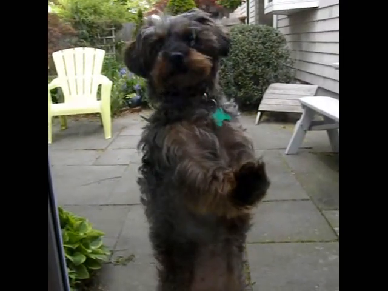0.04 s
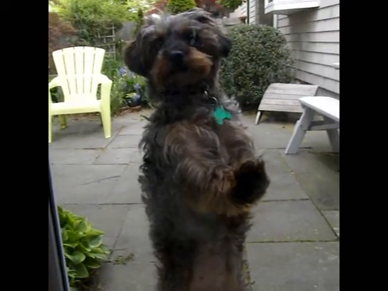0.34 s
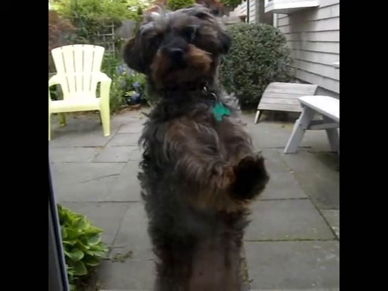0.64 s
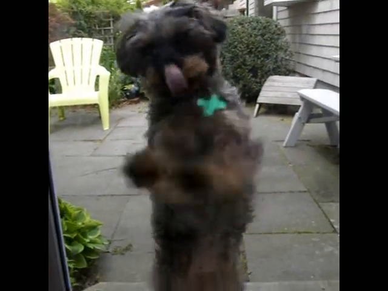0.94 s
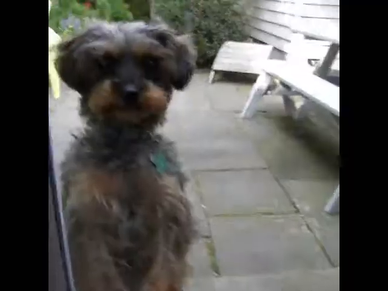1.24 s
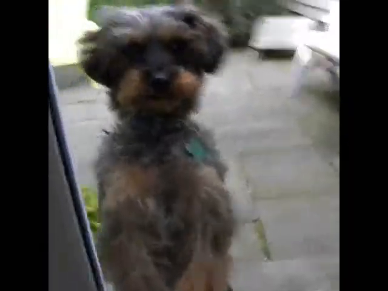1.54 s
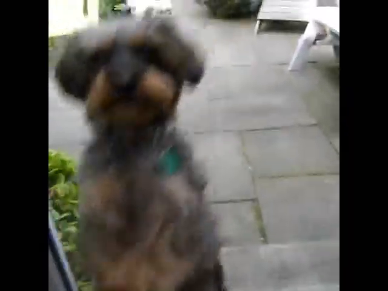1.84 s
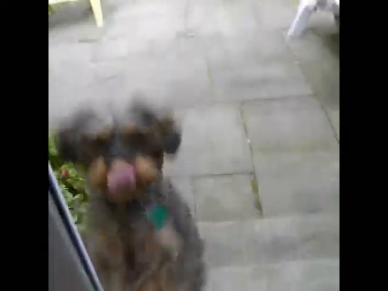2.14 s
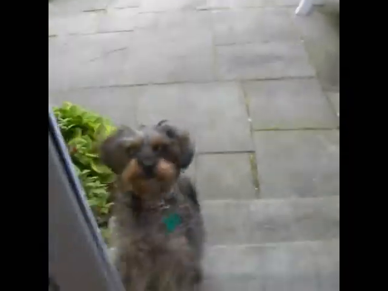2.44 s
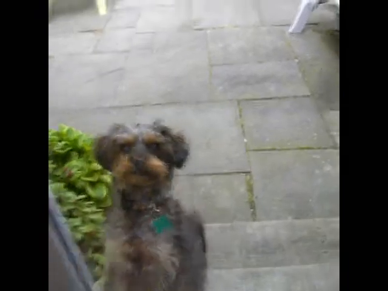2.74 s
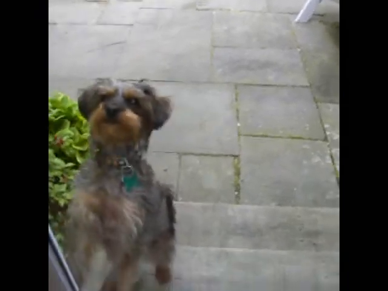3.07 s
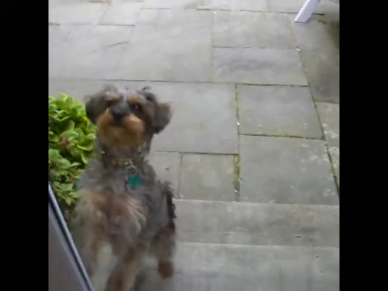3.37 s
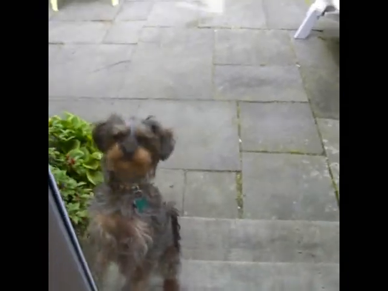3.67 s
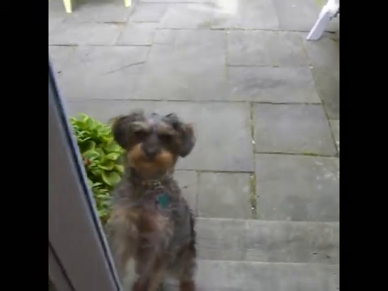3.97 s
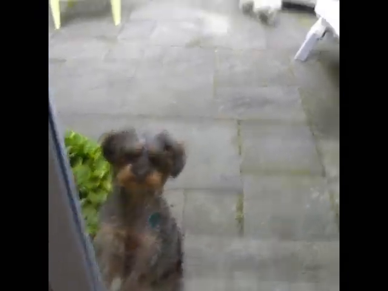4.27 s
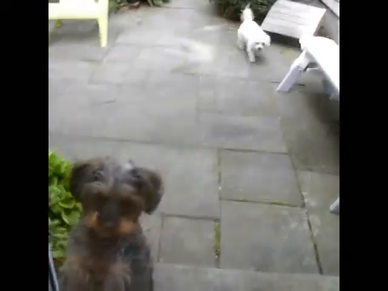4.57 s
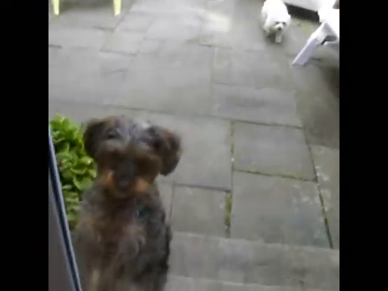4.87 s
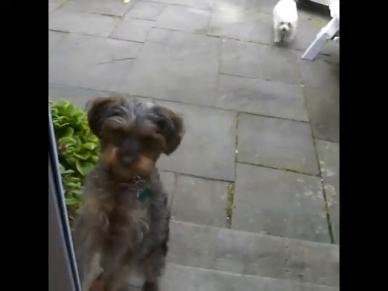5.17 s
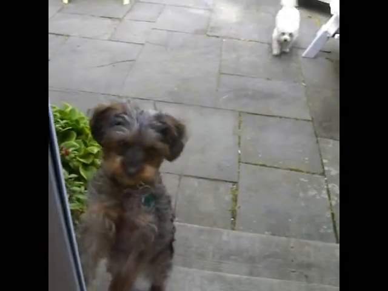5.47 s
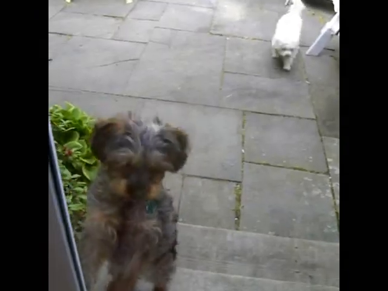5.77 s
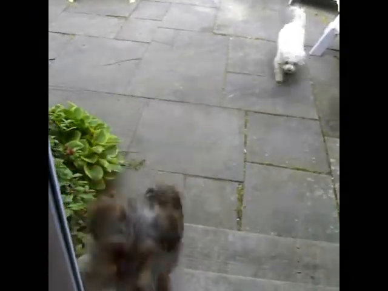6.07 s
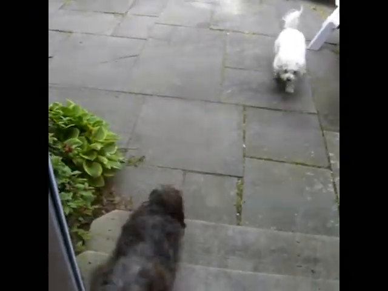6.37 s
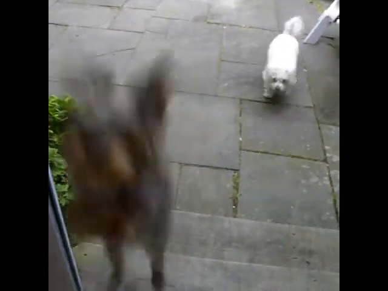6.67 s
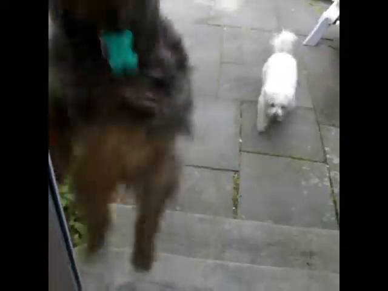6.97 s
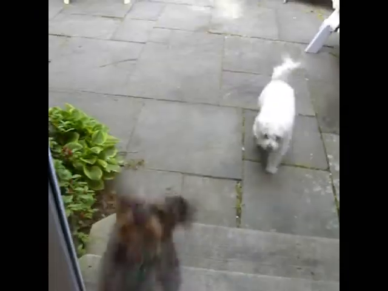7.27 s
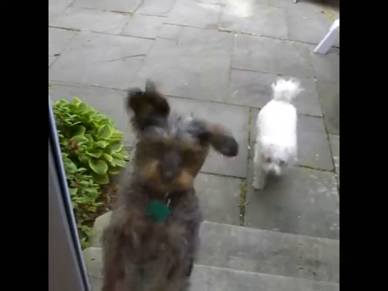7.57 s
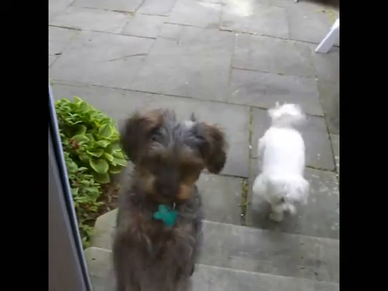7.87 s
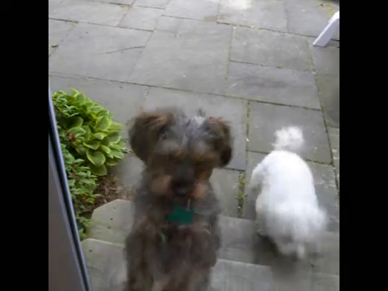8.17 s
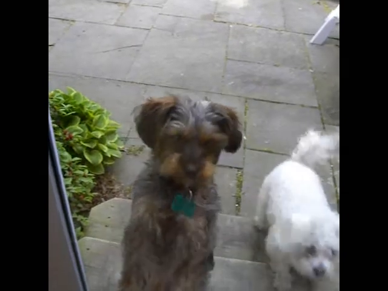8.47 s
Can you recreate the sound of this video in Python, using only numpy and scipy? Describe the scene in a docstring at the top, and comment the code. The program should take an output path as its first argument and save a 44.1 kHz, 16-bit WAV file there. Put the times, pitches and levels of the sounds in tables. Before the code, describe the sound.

Claws click, skid and scratch against a glass door as a small dog jumps at it, over a faint outdoor hush.

```python
"""Small dog at a glass patio door

Heard from the room, on a camera's microphone: a small dog jumps at the door. Its claws tap, skid and
scrape on the glass, and its paws bump the pane. Right at the microphone a hand rubs on the camera in
short strokes and a thin whine, likely the lens motor, comes and goes. A soft, distant outdoor hush
and a faint room hum lie under everything."""
import sys
import numpy as np
from scipy import signal
from scipy.fft import rfft, irfft, next_fast_len
from scipy.io import wavfile
from scipy.ndimage import uniform_filter1d, map_coordinates

SR = 44100
rng = np.random.default_rng(int(sys.argv[2]) if len(sys.argv) > 2 else 0)


def master_out(mix):
    """Clip the mix to full scale and print it as 16-bit PCM to the path in sys.argv[1]."""
    frames = np.transpose(np.atleast_2d(mix))
    ceiling = np.clip(frames, -1, 1)
    pcm = np.round(ceiling * 32767).astype(np.int16)
    wavfile.write(sys.argv[1], SR, pcm)


N = 379701
HIT_SIZE = 8192  # samples in one contact


# Spectrum of a claw on the glass: (frequency [Hz], level [dB])
CLAW_SPECTRUM = [(60, -5), (500, -14), (1050, 0), (1600, 0.5), (2300, -1), (5600, -4), (6600, -15.5),
                 (8000, -24.5), (9500, -10.5), (14500, -17)]
def tap(db, pitch_hz, body_db, blow=0.95, skid=0.15, chatter=0.18, chatter_t60=0.0077, ring_share=0.27):
    """A claw lands in one sharp blow, skids for some milliseconds and rings briefly."""
    t, octaves = np.arange(HIT_SIZE) / SR, np.log2(pitch_hz / 2140)
    # a higher tap is struck with the tip: more 4 kHz edge, less ring; a hollow one has less of both
    edge_db = -4.5 + 15 * octaves - 0.25 * body_db
    reflection = 0.7 - 0.77 * octaves - 0.15 * body_db
    skid_t60 = 0.022 * .5 ** (db / 19)  # a harder tap sticks sooner
    friction = skid * amp(-60 * t / skid_t60) + chatter * amp(-60 * t / chatter_t60)
    force = slips(HIT_SIZE, spiky_db=3) * friction
    force[0] += blow

    def contact(hz):
        # the harder the blow, the more of it gathers around the ring pitch and its third partial
        focus_db = 4 * amp(db / 2) * (hump(hz, pitch_hz, 0.16) + hump(hz, 3 * pitch_hz, 0.067))
        tint_db = body_db * hump(hz, 1070, 0.31) + edge_db * hump(hz, 4350, 0.26) + focus_db
        ring = 1 - ring_share + ring_share * odd_ring(hz, pitch_hz, reflection)
        low_cut = 1j * hz / (260 + 1j * hz)
        return causal(along(CLAW_SPECTRUM, hz) + tint_db) * ring * low_cut * edge_echoes(hz)
    return filtered(force, contact)


# Hard claw taps on the pane: (time [s], relative level [dB], ring pitch [Hz], body near 1 kHz [dB])
CLAW_TAPS = [(1.4243, -14, 2650, 8), (1.499, -18.5, 2570, 2), (1.5786, -17, 2550, 20),
             (1.589, -17.5, 2000, 15), (1.6035, -13, 1840, 8), (1.6227, -13.5, 2510, 5),
             (1.7278, -16, 1990, 3), (2.3525, -9, 1980, -3), (2.3582, -11, 2060, -9),
             (2.378, -5, 2020, -26), (2.6192, -18, 2110, 0), (2.6347, -12, 2800, -3), (3.161, -19, 2420, 4),
             (3.208, -1, 2130, 7.5), (3.3857, -14, 2450, -15), (3.663, -8.5, 2620, -6),
             (3.685, -24, 2290, -7), (3.9925, -19.5, 2160, 10), (4.017, -20.5, 2740, 5),
             (4.0481, -20, 2720, 4), (4.1635, -18, 2440, -13.5), (4.577, -14, 2260, 1),
             (5.256, -15, 1590, 11), (5.2805, -13.5, 2400, 10), (5.2861, -6, 2320, 4),
             (5.8473, -22, 2560, 16.5), (6.115, -25, 1950, -2), (6.3785, -16.5, 1940, -3),
             (6.4057, -13.5, 2400, -8.5), (6.5405, -10.5, 2250, -5), (6.6486, -18, 2370, -8),
             (6.7426, -17, 2280, -8), (6.9668, 4.5, 1997, -3), (6.9733, -5.5, 2060, -6),
             (7.1655, -1, 2150, 8), (7.203, -11.5, 2020, 0.5), (7.3199, -6.5, 2020, -5),
             (7.3322, -17.5, 2450, -6), (7.3534, -20, 2110, 2), (7.392, -18.5, 2040, -2),
             (7.451, -15.5, 2200, -6), (7.46, -17, 2160, -1), (7.494, -7, 2060, 0), (7.575, -1, 2320, -1.5),
             (7.6163, -6.5, 2520, -3), (7.6221, -8.5, 2350, -14)]
def taps(level_db=-9.5):
    """Claws strike the glass in flurries as the dog jumps."""
    out = np.zeros(N)
    for s, db, pitch_hz, body_db in CLAW_TAPS:
        add(out, s, tap(db, pitch_hz, body_db), db + level_db)
    return out


# Runs of light claw ticks at the door: (start [s], end [s], relative level [dB])
TICK_RUNS = [(2.8, 2.896, -23.5), (4.042, 4.151, -26)]
def patter(level_db=-10, pitch_hz=2300, body_db=4, count=3):
    """A few light ticks fall at uneven moments, and unevenly hard, as the paws shift."""
    out = np.zeros(N)
    for start, end, db in TICK_RUNS:
        for s in start + (end - start) * (np.arange(count) + rng.random(count)) / count:
            strength_db = db + rng.uniform(-3, 3)
            add(out, s, tap(db, pitch_hz, body_db), strength_db + level_db)
    return out


# Dry scrapes on the glass: (time [s], relative level [dB], t60 [s])
CLAW_SCRAPES = [(1.1169, -27, 0.095), (1.1476, -26, 0.038), (1.825, -17, 0.05), (2.0793, -16.5, 0.023),
                (2.085, -18.5, 0.032), (2.4896, -24.5, 0.051), (2.827, -24.5, 0.036),
                (3.4403, -26.5, 0.057), (4.5816, -22.5, 0.032), (6.4036, -25, 0.046), (6.491, -29, .045),
                (6.5414, -25, .099), (6.6074, -24.5, 0.059), (6.9807, -19, .075), (7.1658, -16.5, 0.091),
                (7.2601, -17, 0.076), (7.5774, -19.5, .049), (7.9705, -18.5, 0.034), (7.9764, -13, 0.075),
                (8.2461, -16.5, 0.066), (8.536, -24.5, 0.076)]
# Spectrum of the scraping tip: (frequency [Hz], level [dB])
SCRAPE_SPECTRUM = [(50, -27), (200, -17), (1500, -13), (2800, -7.5), (4200, -2), (5500, -13.5), (6600, -23),
                   (8100, -12.5), (9600, -27), (12000, -11), (15500, -21)]
def scrapes(level_db=-7, ring_hz=3680, reflection=0.31, attack_s=0.0013, spread=0.032):
    """A claw tip chatters: a clump of slips with a higher ring, a little different each time."""
    out, t = np.zeros(N), np.arange(HIT_SIZE) / SR
    for s, db, t60 in CLAW_SCRAPES:
        pitch_hz = ring_hz * np.exp(spread * rng.standard_normal())
        force = slips(HIT_SIZE, spiky_db=2.5) * amp(-60 * t / t60) * (1 - np.exp(-t / attack_s))
        ring = lambda hz: odd_ring(hz, pitch_hz, reflection) * edge_echoes(hz)
        scrape = filtered(force, lambda hz: causal(along(SCRAPE_SPECTRUM, hz)) * ring(hz))
        add(out, s, scrape, db + level_db)
    return out


# A claw dragged along the glass after a tap: (start [s], length [s], level [dB], fall in level [dB])
CLAW_SLIDES = [(2.366, 0.053, -39, -5), (2.635, 0.0423, -33.5, 0.5), (5.284, 0.072, -35, 12),
               (6.379, 0.039, -38, 12), (6.973, 0.11, -29, 11), (7.177, 0.044, -33, 13),
               (7.504, 0.064, -43.5, 1)]
# Thin, high overtones heard while a claw drags on the glass: (frequency [Hz], width [Hz], level [dB])
THIN_OVERTONES = [(5970, 210, -6.5), (10060, 320, -15), (13700, 410, -21)]
def slides(pitch_hz=1930, width_hz=220, ring_db=8, ramp_s=0.005, waver_db=3):
    """A dragged claw keeps its ring going, with a wavering grip."""
    out, t = np.zeros(N), np.arange(N) / SR
    modes = [(pitch_hz, width_hz, 0), *THIN_OVERTONES]
    contact = lambda hz: amp(along(CLAW_SPECTRUM, hz)) + amp(ring_db) * resonances(hz, modes)
    for s, length, db, fade_db in CLAW_SLIDES:
        during = (t > s) & (t < s + length)
        age = t[during] - s
        hiss = unit(filtered(slips(len(age), spiky_db=6.5), contact))
        ramp = np.minimum(1, np.minimum(age, length - age) / ramp_s)
        out[during] += hiss * amp(db - fade_db * age / length) * ramp
    return out * amp(waver_db * wobble(45))


# A claw tip squeaks on the glass: (time [s], relative level [dB], pitch [Hz])
CLAW_SQUEAKS = [(1.825, -23, 3470), (7.7347, -12.5, 4050), (7.739, -15.5, 3860)]
# Harmonics of a squeak: (multiple of the pitch, level [dB])
SQUEAK_HARMONICS = [(1, -6.5), (2, -23.5), (3, -16.5)]
def squeaks(level_db=-4, rise_s=0.00032, jitter=0.053):
    """For a few milliseconds the slips lock into a pitch."""
    out, t = np.zeros(N), np.arange(HIT_SIZE) / SR
    for s, db, pitch_hz in CLAW_SQUEAKS:
        phase = 2 * np.pi * pitch_hz * t + np.cumsum(jitter * rng.standard_normal(HIT_SIZE))
        tone = sum(amp(level) * np.sin(k * phase) for k, level in SQUEAK_HARMONICS)
        add(out, s, tone * (t / rise_s) ** 2 * np.exp(-t / rise_s), db + level_db)
    return out


# Paws on the door: (time [s], relative level [dB], favoured frequency [Hz])
PAW_BUMPS = [(1.36, -28, 169), (1.424, -12.5, 192), (1.455, -28, 280), (3.132, -29.5, 163),
             (3.443, -25.5, 162), (7.431, -27.5, 221), (7.455, -26, 320)]
# Low modes of the pane: (frequency [Hz], width [Hz], level [dB])
PANE_MODES = [(124, 18, -2), (173, 40, -2), (200, 33, 3), (265, 41, 1), (288, 72, -1), (370, 47, -3),
              (460, 50, -6), (670, 78, -2)]
def bumps(level_db=-4.5, shudder=0.039, t60=0.15, focus_db=9, lag_s=0.00091):
    """A soft pad pushes the pane, which shudders low and dies quickly."""
    out, t = np.zeros(N), np.arange(HIT_SIZE) / SR
    pad_spectrum = [(50, -24), (120, 10.5), (700, 4.5), (3000, -7)]  # (frequency [Hz], level [dB])
    for s, db, pitch_hz in PAW_BUMPS:
        force = shudder * rng.standard_normal(HIT_SIZE) * amp(-60 * t / t60)
        force[0] += 1
        # where and how softly the pad lands picks which modes speak
        pad = lambda hz: causal(focus_db * hump(hz, pitch_hz, 0.55) + along(pad_spectrum, hz))
        bump = filtered(force, lambda hz: pad(hz) * resonances(hz, PANE_MODES))
        add(out, s + lag_s, bump, db + level_db)
    return out


# Hollow knocks in the door: (time [s], relative level [dB])
DOOR_KNOCKS = [(0.816, -35.5), (1.62, -18), (1.759, -27.5), (3.204, -26), (5.846, -22.5), (6.797, -33.5),
               (6.964, -23.5), (7.162, -28)]
# Spectrum of the knocked door: (frequency [Hz], level [dB])
DOOR_SPECTRUM = [(100, -41), (170, -6), (240, 3), (400, 5.5), (540, 10), (680, 2), (830, 12), (1000, -18),
                 (2000, -37), (6000, -44)]
def knocks(level_db=-2, lag_s=0.00261, rattle=0.013, t60=0.11):
    """A firm blow gives a short, hollow knock in the door."""
    out, t = np.zeros(N), np.arange(HIT_SIZE) / SR
    for s, db in DOOR_KNOCKS:
        force = rattle * rng.standard_normal(HIT_SIZE) * amp(-60 * t / t60)
        force[0] += 1
        knock = filtered(force, lambda hz: causal(along(DOOR_SPECTRUM, hz)))
        add(out, s + lag_s, knock, db + level_db)
    return out


def landing(at_s=6.965, level_db=-27, push_s=0.0011):
    """The dog's whole weight gives the pane one low push, without a ring."""
    out, age = np.zeros(N), np.arange(HIT_SIZE) / SR / push_s
    add(out, at_s, (1 - age / 2) * age * np.exp(-age), level_db)
    return out


# The hand's steady drag on the camera, right at the microphone: (time [s], level [dB])
HAND_DRAG = [(1.15, -51.5), (1.28, -43), (1.7, -45.5), (2.75, -44.5), (3.1, -41), (3.4, -43), (3.6, -39.5),
             (3.8, -50), (4.8, -57)]
# Single strokes of hand or fur, close by: (middle [s], relative level [dB], half length [s])
RUB_STROKES = [(1.378, -39.5, 0.033), (1.435, -35, 0.024), (1.57, -42, .028), (2.047, -43.5, 0.056),
               (2.49, -45, 0.038), (2.877, -40.5, 0.056), (3.144, -41.5, 0.077), (3.511, -42.5, 0.031),
               (3.606, -51, 0.033), (3.676, -33.5, 0.021), (4.055, -42, 0.022), (4.417, -48.5, 0.019),
               (6.424, -50, 0.043), (6.548, -43.5, 0.042), (6.814, -49, 0.056), (7.47, -52.5, .12)]
# Spectrum of rubbing skin: (frequency [Hz], level [dB])
SKIN_SPECTRUM = [(60, -36), (240, -20), (400, -6), (528, -9.5), (579, -4.5), (719, -16), (789, -11),
                 (1090, -5.5), (2970, -2), (3990, -7), (5030, -6.5), (7990, -22), (12900, -12),
                 (15300, -22), (16000, -30)]
def rubbing(stroke_db=2.5, flutter_db=1.7, sway_db=1.9):
    """Skin and fur drag over hard surfaces with a fine, unsteady grain; strokes ride on the drag."""
    drag = amp(sway_db * wobble(14)) * swell(HAND_DRAG)
    stroke_power = sum((amp(db + stroke_db) * bell(s, half)) ** 2 for s, db, half in RUB_STROKES)
    grain = slips(N, spiky_db=2.5) * amp(flutter_db * wobble(90))
    friction = unit(filtered(grain, lambda hz: causal(along(SKIN_SPECTRUM, hz))))
    return np.sqrt(drag ** 2 + stroke_power) * friction


# Resonances of the motor, beside the microphone: (frequency [Hz], width [Hz], level [dB])
MOTOR_MODES = [(2090, 110, -1.5), (2600, 90, -7), (5870, 270, -12), (10050, 350, -16), (13900, 400, -27)]
def whine(start_s=5.14, end_s=5.92, level_db=-52, ramp_s=.06, hiss_db=-12, waver_db=2):
    """A tiny motor, likely in the lens, runs briefly: a wavering, resonant buzz over a faint hiss."""
    t = np.arange(N) / SR
    running = np.clip(np.minimum(t - start_s, end_s - t) / ramp_s, 0, 1)
    motor = lambda hz: resonances(hz, MOTOR_MODES) + amp(hiss_db + along(SKIN_SPECTRUM, hz))
    buzz = unit(filtered(slips(N, spiky_db=4.5), motor))
    return amp(level_db + waver_db * wobble(40)) * running * buzz


# Faint hollow swishes: (middle [s], level [dB], pitch [Hz], half length [s])
SOFT_SWISHES = [(3.344, -43, 570, 0.024), (8.234, -53.5, 420, 0.012), (8.274, -52, 700, 0.018)]
def swishes(octaves=0.13):
    """Short, soft swells of narrow noise."""
    out = np.zeros(N)
    for s, db, pitch_hz, half in SOFT_SWISHES:
        band = unit(filtered(rng.standard_normal(N), lambda hz: hump(hz, pitch_hz, octaves)))
        out += amp(db) * bell(s, half) * band
    return out


# Spectrum of the outdoors, far from the microphone: (frequency [Hz], level [dB])
OUTDOOR_SPECTRUM = [(15, -43), (25, -2), (70, -10.5), (120, -4.5), (170, -8), (212, -4), (363, -1.5),
                    (503, -4.5), (607, -4), (1100, -6.5), (1370, -7.5), (1650, -8.5), (4490, -14),
                    (8140, -25.5), (11300, -21.5), (16000, -27.5)]
def hush(level_db=-48.5):
    """Distant outdoor noise, soft and even."""
    air = filtered(rng.standard_normal(N), lambda hz: amp(along(OUTDOOR_SPECTRUM, hz)))
    return amp(level_db) * unit(air)


# Low resonances of the room: (frequency [Hz], width [Hz], level [dB])
ROOM_MODES = [(185, 55, -16), (230.2, 5.9, 5), (284.5, 10, 0), (378.7, 11.5, 7.5), (419, 18, 3)]
# The room's drone at the microphone: (time [s], level [dB])
DRONE_LEVEL = [(0, -57), (5, -59.5), (7, -56.5), (8.6, -52)]
def hum():
    """A faint, wavering drone on the room's low resonances."""
    drone = filtered(rng.standard_normal(N), lambda hz: resonances(hz, ROOM_MODES))
    return swell(DRONE_LEVEL) * unit(drone)


# Decay of the room around the microphone: (frequency [Hz], t60 [s])
ROOM_DECAY = [(200, 0.64), (2000, 0.42), (12000, 0.4)]
def room(x, tail_db=-14, boom_db=-11):
    """The room answers with a short tail, whose treble dies first, and a boom on its low modes."""
    hz, t, noise = signal.stft(rng.standard_normal(SR // 2), SR, nperseg=256)
    decay = amp(-60 * t / along(ROOM_DECAY, hz)[:, None])
    tail = signal.istft(noise * decay, SR, nperseg=256)[1]
    echo = signal.fftconvolve(x, tail / np.linalg.norm(tail))[:N]
    boom = filtered(x, lambda hz: resonances(hz, ROOM_MODES))
    return amp(tail_db) * echo + amp(boom_db) * boom


def slips(size, spiky_db):
    """Stick-slip noise of rms 1: grains of uneven strength, half a millisecond each."""
    strength = np.repeat(rng.standard_normal(size // 20 + 1), 20)[:size]
    return unit(rng.standard_normal(size) * amp(spiky_db * strength))


def odd_ring(hz, pitch_hz, reflection):
    """A wave that returns inverted each half cycle rings at 1, 3, 5, 7 times the pitch."""
    return 1 / (1 + np.clip(reflection, 0, .85) * np.exp(-1j * np.pi * hz / pitch_hz))


def edge_echoes(hz, strength=0.14, longest_s=.0045, count=6):
    """Waves return from the pane's edges within milliseconds, differently for each spot that is hit."""
    delays = rng.uniform(longest_s / 4, longest_s, count)
    signs = rng.choice([-1, 1], count)
    return 1 + strength * (signs * np.exp(-2j * np.pi * hz[:, None] * delays)).sum(axis=1)


def resonances(hz, modes):
    """The causal response of modes (frequency [Hz], width [Hz], level [dB])."""
    return sum(amp(db) * 1j * hz * width / (centre ** 2 - hz ** 2 + 1j * hz * width)
               for centre, width, db in modes)


def causal(gain_db):
    """The minimum-phase response with this gain: nothing sounds before the blow."""
    cepstrum = irfft(np.log(amp(gain_db)))
    half = len(cepstrum) // 2
    cepstrum[1:half] *= 2
    cepstrum[half + 1:] = 0
    return np.exp(rfft(cepstrum))


def filtered(x, response):
    """x through a complex response of frequency."""
    size = next_fast_len(len(x) + HIT_SIZE, real=True)
    return irfft(rfft(x, size) * response(np.fft.rfftfreq(size, 1 / SR)), size)[:len(x)]


def along(points, hz):
    """Points (frequency [Hz], value) joined on a log axis."""
    f, v = np.transpose(points)
    return np.interp(np.log(hz + 1), np.log(f + 1), v)


def hump(hz, centre_hz, octaves):
    """A bell of height 1 on the log-frequency axis."""
    return np.exp(-.5 * (np.log2((hz + 1) / centre_hz) / octaves) ** 2)


def bell(s, half):
    """A smooth rise and fall of height 1 around time s."""
    return np.exp(-.5 * ((np.arange(N) / SR - s) / half) ** 2)


def swell(rows):
    """Gain per sample of a curve (time [s], level [dB]), silent outside it."""
    return amp(np.interp(np.arange(N) / SR, *np.transpose(rows), left=-120, right=-120))


def wobble(rate):
    """A smooth random curve, rate knots a second."""
    return map_coordinates(rng.standard_normal(int(N * rate / SR) + 4), [np.arange(N) * rate / SR])


def add(track, s, hit, db):
    """Lay a hit on the track at time s with its loudest millisecond at db."""
    loudest = np.sqrt(np.abs(uniform_filter1d(hit ** 2, size=44)).max())
    part = track[round(s * SR):][:len(hit)]
    part += amp(db) * hit[:len(part)] / loudest


def amp(db):
    """Decibels to gain."""
    return 10 ** (np.asarray(db) / 20)


def unit(x):
    """x at rms 1."""
    return x / np.sqrt(np.mean(x ** 2) + 1e-20)


def scene():
    """The dog at the door and the room's answer, with the camera's noises close and the hush far off."""
    dog = taps() + patter() + scrapes() + squeaks() + bumps() + landing() + knocks() + slides()
    return (dog + room(dog) + rubbing() + whine() + swishes() + hush() + hum())[None]


def record(dry, top_hz=15500):
    """The camera's one channel keeps nothing above its band limit."""
    band_limit = lambda hz: np.clip((top_hz - hz) / 200 + .5, 0, 1)
    return np.array([filtered(channel, band_limit) for channel in dry])


dry = scene()
out = record(dry)
master_out(out)
```